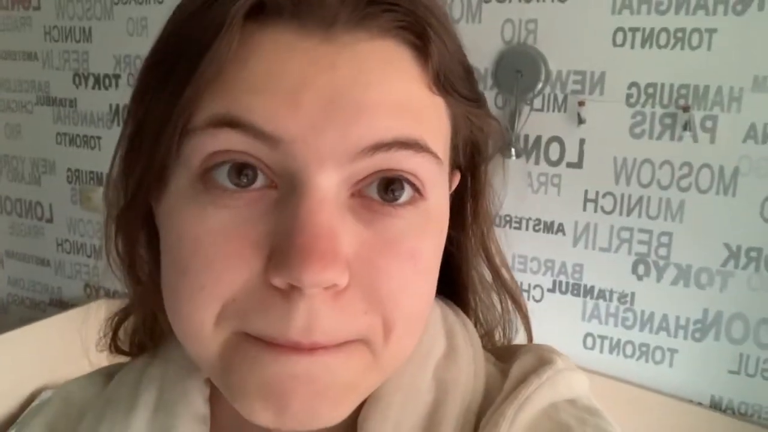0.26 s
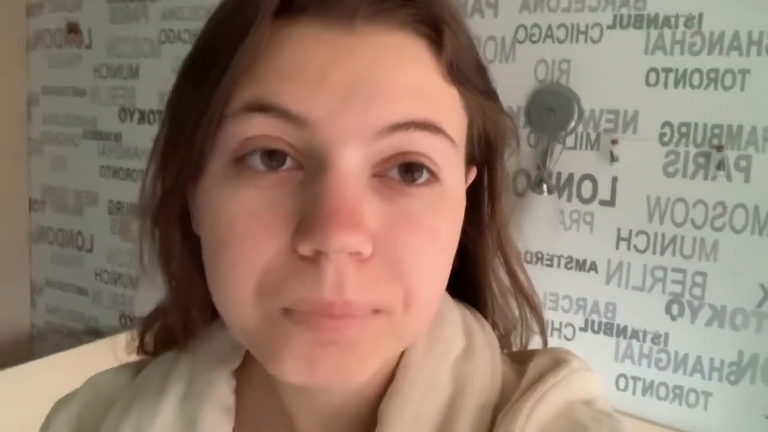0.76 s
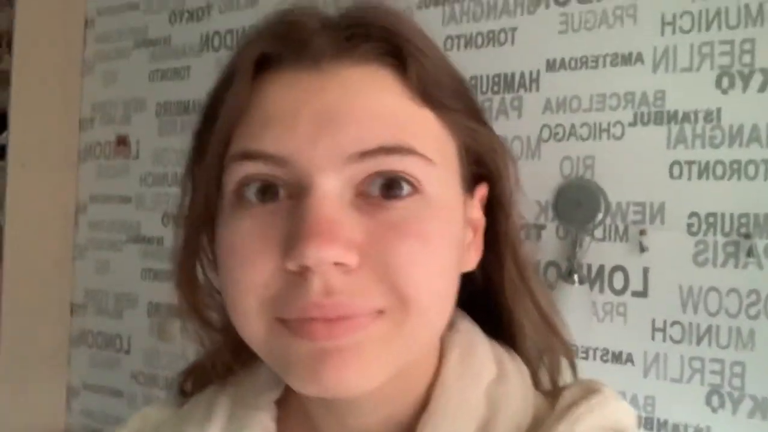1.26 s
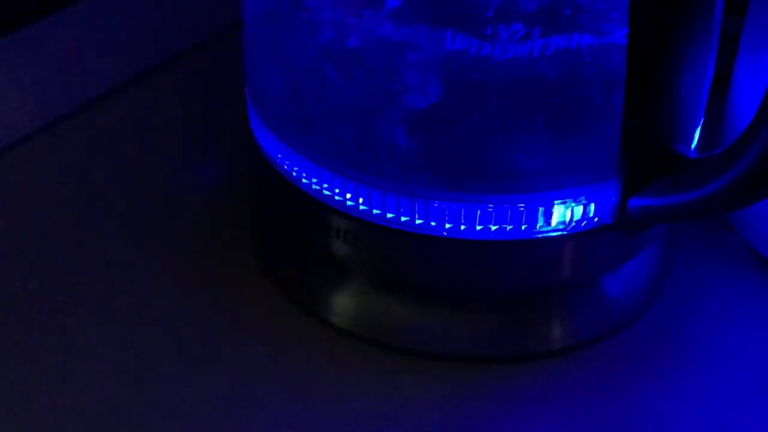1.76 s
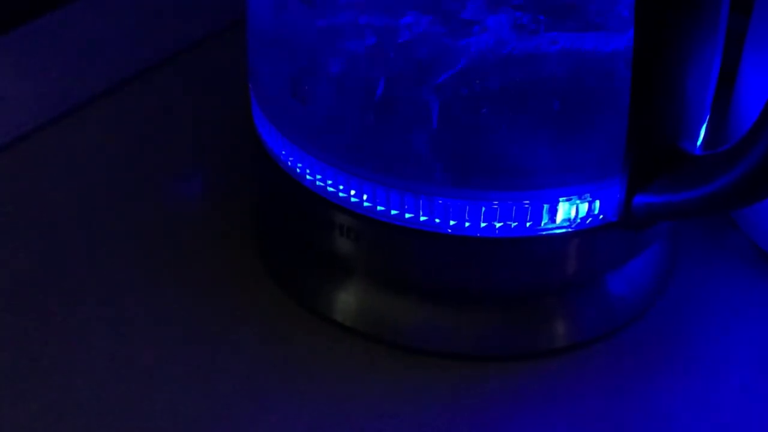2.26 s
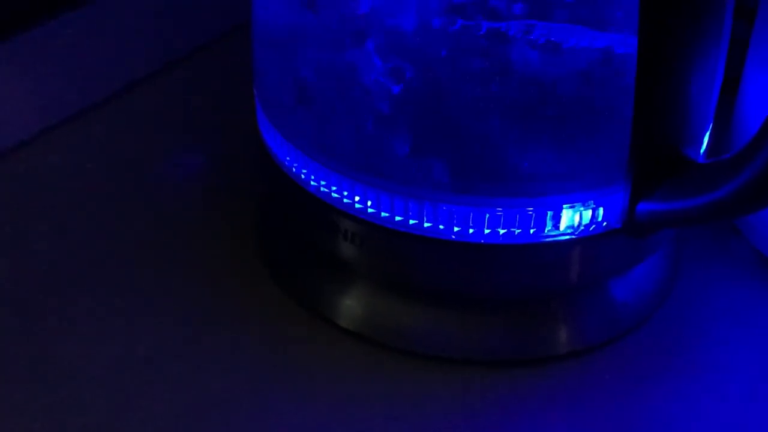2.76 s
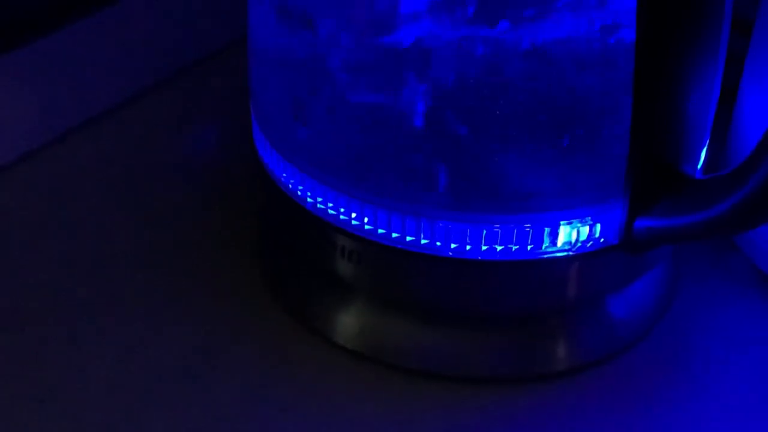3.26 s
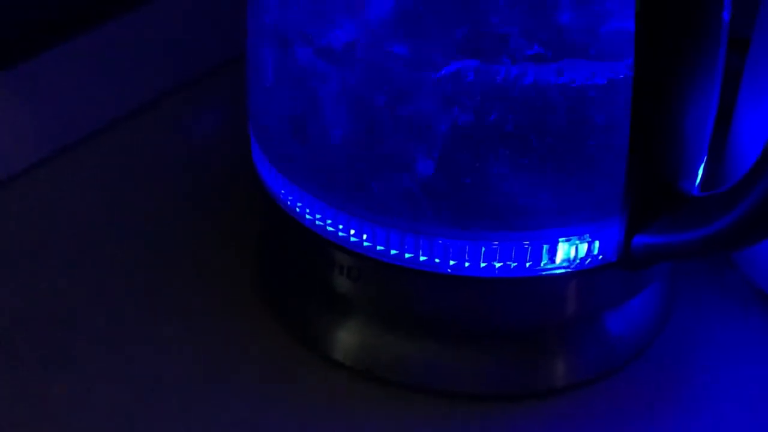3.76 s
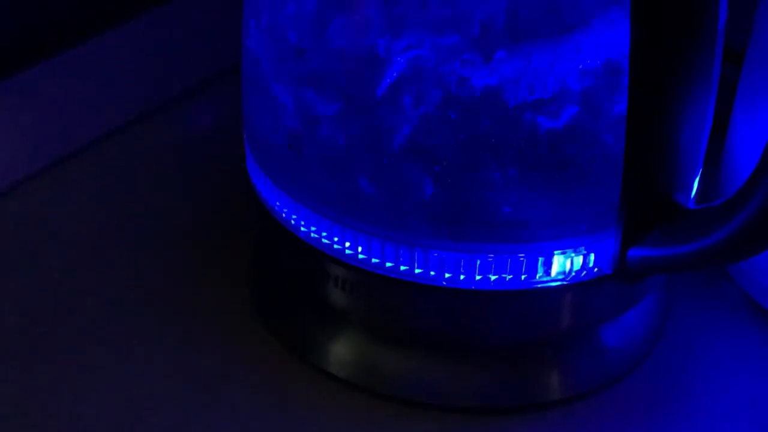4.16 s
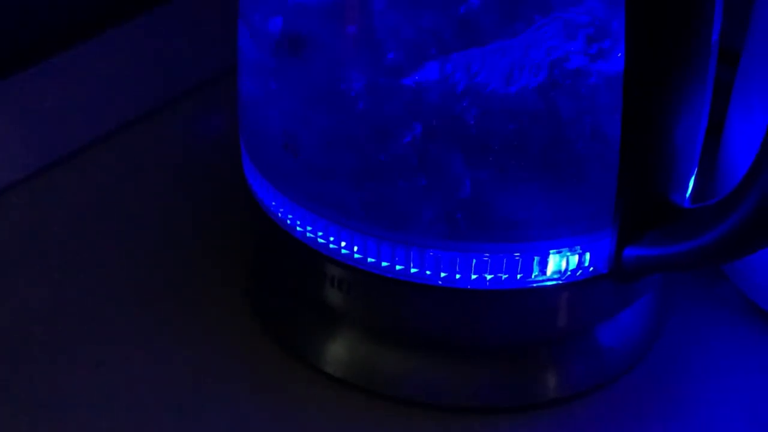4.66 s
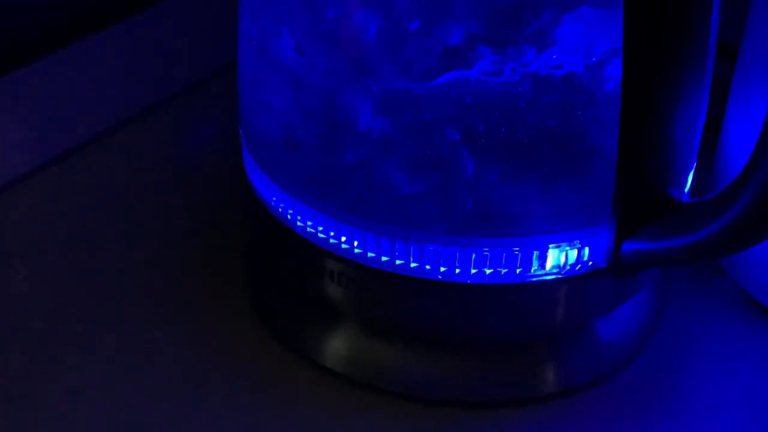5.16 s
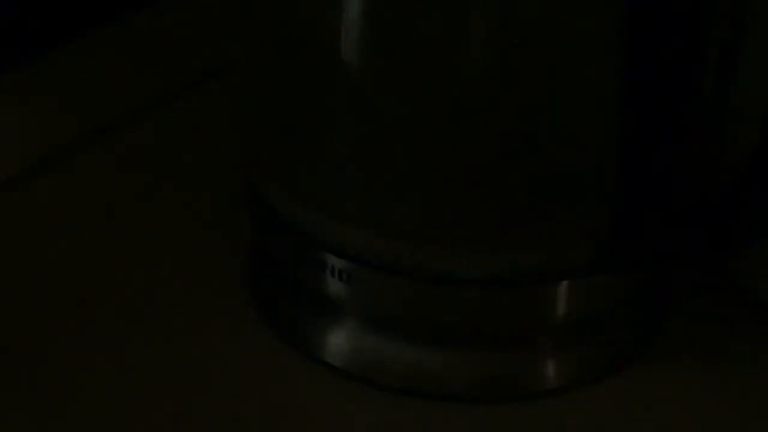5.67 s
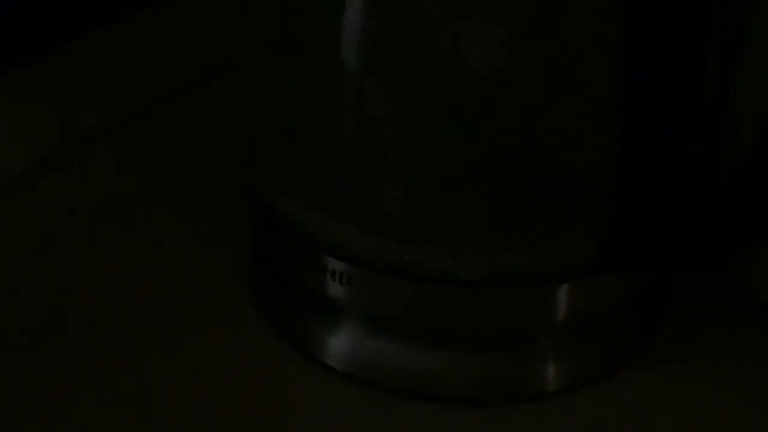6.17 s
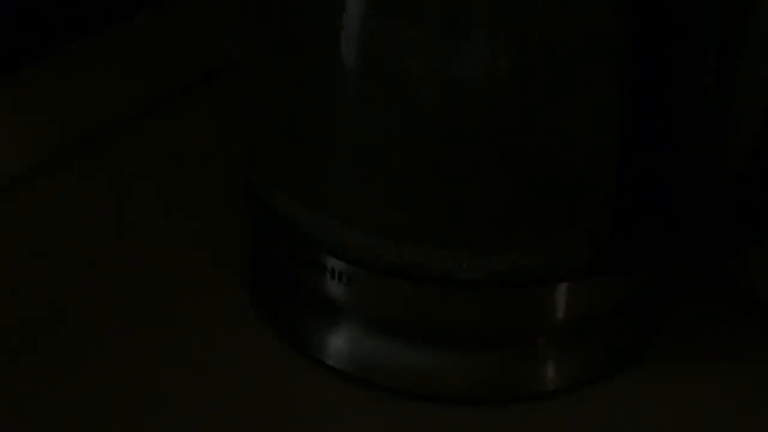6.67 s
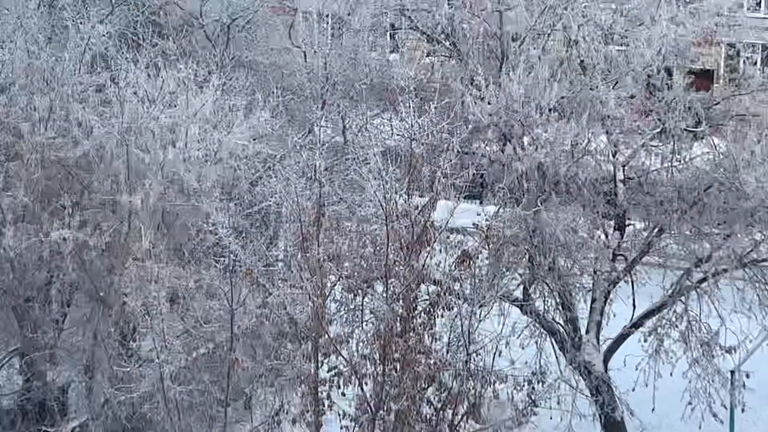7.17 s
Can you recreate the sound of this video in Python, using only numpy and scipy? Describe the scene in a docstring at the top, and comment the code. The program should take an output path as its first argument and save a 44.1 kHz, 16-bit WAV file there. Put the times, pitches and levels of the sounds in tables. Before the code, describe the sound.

Close phone pickup in a small kitchen. First faint room tone and dull handling knocks, then suddenly a rolling boil, low blubs around a steady throaty rumble, with thin simmering, plips and bright ticks of spray on top. A sharp plastic-and-metal switch click stands far above it, with a short room echo. Bubbling continues nearly unchanged for two seconds, then cuts off to a faint hum and thin swish.

```python
"""A small quiet kitchen, where a glass electric kettle is heard close to a phone at a rolling boil. Big steam
bubbles are swelling tones, and random thumps shake the water column. Small bubbles are short rings that simmer,
break and fizz; spat drops are noise ticks with short splashes. The thermostat snaps off with one sharp click,
made of noise rattles and ringing parts; the hot base keeps the water rolling. The kettle sound begins and ends
abruptly: quiet room tone comes before it, and after it that tone goes on with a faint hum added."""
import sys
import numpy as np
from scipy import signal
from scipy.fft import rfft, irfft, next_fast_len
from scipy.io import wavfile
from scipy.ndimage import uniform_filter1d

SR = 44100
rng = np.random.default_rng(int(sys.argv[2]) if len(sys.argv) > 2 else 0)


def file_out(sig):
    """Save sig as 16-bit WAV at sys.argv[1]."""
    # one column per channel
    cols = np.atleast_2d(sig).T
    # limit, then scale
    lim = np.clip(cols, -1, 1)
    pcm = np.round(lim * 32767).astype(np.int16)
    wavfile.write(sys.argv[1], SR, pcm)


N = 327266
T = np.arange(N) / SR  # time of every sample in seconds
SIZE = next_fast_len(N + SR, real=True) // 2 * 2
FREQS = np.arange(SIZE // 2 + 1) * SR / SIZE  # in Hz

BOIL_FROM_S, BOIL_TO_S, LEVER_S = 1.4735, 7.0708, 5.1971
EASE_DB_PER_S = 0.2  # the lesser rolling bubbles die down slowly once the heater is off
CHURN_DB, GURGLE_DB, SIMMER_DB, SPRAY_DB = -34, -36.5, -54.5, -6.5
# The rolling water makes layers surge at random: new steps per second, and depth in dB.
SURGE_RATE = 14
CHURN_SURGE_DB, SIMMER_SURGE_DB, SPRAY_SURGE_DB = .5, 1.2, 2.2
# Time for the echoes to fall by 60 dB, for the low part and the treble.
ROOM_T60_S, ROOM_T60_TOP_S = 0.43, 0.26
ECHOES_MERGE_S = .05
SHARED_HZ, SHARED_LAG_SAMPLES, TOP_HZ = 6200, 8, 15900

# Levels in these tables are starting points: the sources trim, filter or mix them further.
# Soft knocks of the hand on the phone. Each row: start in seconds, thud level in dB,
# tick level in dB, tick pitch in Hz.
HAND_KNOCKS = [(0.645, -57, -66.5, 2200), (0.668, -68, -76, 2200), (1.095, -60, -82, 1700),
               (1.346, -75, -68.5, 1100), (1.371, -69, -69, 1100), (1.385, -59, -59.5, 1020)]
# The switch lets go, snaps over, throws its lever and settles. Each row: start in seconds,
# steel disc level in dB, plastic rattle level in dB, decay in seconds.
SWITCH_STEPS = [(5.1903, -24.5, -26.5, 0.0067), (5.196, -7.5, -23.5, 0.0013), (5.1978, -14.5, -17, 0.0023),
                (5.2007, -20.5, -20, .0025)]
# Tones of the plastic housing, rung by the lever. Each row: pitch in Hz, level in dB,
# time to fall by 60 dB in seconds.
HOUSING_TONES = [(720, -5, .014), (1010, -19, .01), (1190, -21.5, .014), (1348, -16, .016),
                 (1860, -25, .024), (2290, -26.5, .022), (2710, -18, .024), (3100, -20.5, .028),
                 (3420, -24, .026), (4680, -27.5, 0.022), (5330, -27.5, .025), (5817, -28, .02),
                 (6700, -32, .03), (7500, -24.5, .022)]
# Faint tones of the jug after the jolt. Each row: pitch in Hz, level in dB,
# time to fall by 60 dB in seconds.
AFTER_RING_TONES = [(665, -39, 0.3), (866, -46, .25), (1254, -44, 0.43), (1370, -45, .38), (1650, -48, .3),
                    (1829, -48, 0.38), (2740, -45, .26), (2912, -48, .35), (4705, -48, 0.25),
                    (6600, -49, 0.23), (6700, -50, 0.27)]
# The biggest drops spat from the surface. Each row: start in seconds, tick level in dB,
# splash level relative to the tick in dB.
SPAT_DROPS = [(1.6636, -53, -12), (1.7308, -55.5, 1), (1.9735, -43, -12), (2.0948, -55, -5),
              (2.406, -55, 4), (2.4317, -47.5, -4.5), (2.4754, -46, -8), (2.4834, -53.5, 0),
              (2.595, -55.5, 4.5), (2.7496, -47.5, -8), (2.8812, -44, -7.5), (2.922, -44.5, -8),
              (2.994, -53, -13), (3.2443, -44.5, -9), (3.2737, -54, -6), (3.288, -47, -14),
              (3.3166, -49, -12), (3.333, -49, -9), (3.397, -50, -6), (3.4508, -49, -5), (3.5053, -50, -4),
              (3.6685, -48, -4.5), (3.7013, -53, -2), (3.801, -43, -7.5), (3.821, -53.5, 7.5),
              (3.8524, -51, -8), (3.9234, -48, -8), (4.0854, -64, 14), (4.247, -52, -4), (4.374, -49.5, -5),
              (4.4071, -54, -4), (4.6386, -50, -7), (4.9, -46, -7), (4.9332, -38, -8), (4.9606, -46, -12),
              (5.0018, -53.5, -3.5), (5.055, -50.5, -5), (5.4537, -49, -3), (5.482, -42, -6),
              (5.555, -42, -11), (5.6578, -59, -13), (5.7481, -49, -11), (5.8326, -52, 0.5),
              (5.8768, -50, -7), (6.1789, -45, -6.5), (6.3277, -57, -1), (6.397, -56, -1),
              (6.4743, -44.5, -22), (6.495, -54, -5), (6.7147, -64.5, 14)]
# How strong the surface spray is. Each row: time in seconds, level in dB.
SPRAY_COURSE = [(1.5, -59), (1.55, -77), (2.27, -65.5), (3.22, -67.5), (3.3, -58.5), (3.57, -65),
                (3.82, -59), (4.17, -63.5), (4.4, -58), (4.52, -67.5), (4.87, -68.5), (4.92, -59.5),
                (5.15, -61.5), (5.55, -62), (5.67, -64), (6.55, -61), (6.62, -71.5), (7.05, -59.5)]
# The loudest bubbles that break at the surface. Each row: start in seconds, level in dB, pitch in Hz.
BREAKING_BUBBLES = [(1.706, -35, 494), (1.734, -44.5, 3030), (1.855, -39, 480), (2.095, -40, 690),
                    (2.116, -38, 624), (2.168, -39.5, 560), (2.2007, -46, 1880), (2.281, -36.5, 637),
                    (2.2995, -45, 2000), (2.365, -42, 570), (2.4786, -46.5, 1470), (2.697, -38, 590),
                    (3.0518, -49.5, 1340), (3.267, -50, 710), (3.37, -39.5, 640), (3.3985, -48, 3120),
                    (3.5292, -48.5, 1850), (3.637, -38.5, 482), (3.669, -50, 3445), (3.7248, -47, 4050),
                    (3.8021, -47, 3660), (3.823, -40.5, 4100), (3.904, -41, 519), (3.935, -37.5, 493),
                    (4.0695, -39, 1890), (4.137, -47, 3057), (4.209, -41.5, 630), (4.304, -36, 636),
                    (4.35, -34, 495), (4.5689, -43.5, 1450), (4.6407, -47.5, 1350), (4.902, -33, 487),
                    (4.933, -35, 534), (5.025, -49, 3143), (5.06, -49.5, 3488), (5.489, -45, 2110),
                    (5.516, -50, 3316), (5.597, -41, 600), (5.695, -40, 570), (5.858, -46, 3340),
                    (5.885, -40, 560), (6.201, -46, 3574), (6.242, -49, 1636), (6.4221, -46, 2000),
                    (6.557, -40.5, 554), (6.6786, -45.5, 1460), (6.718, -42, 1950), (6.8023, -47.5, 3640),
                    (6.972, -53, 3290), (7.043, -39, 747), (7.054, -42, 1750), (7.0598, -39, 2077),
                    (7.063, -42, 2550)]
# The biggest steam bubbles. Each row: time in seconds, level in dB, pitch in Hz.
BIG_BUBBLES = [(1.578, -21, 287), (1.783, -24, 306), (1.855, -23, 276), (1.936, -19.5, 269.6),
               (2.057, -26.5, 311.5), (2.213, -23, 300), (2.386, -24, 307), (2.41, -24, 272),
               (2.5, -25.5, 298), (2.553, -27.5, 136.7), (2.65, -20.5, 289), (2.66, -28.5, 128.7),
               (2.754, -22.5, 287), (2.905, -26.5, 261), (3.066, -19, 304.5), (3.125, -23.5, 159.6),
               (3.256, -25, 324), (3.325, -24, 280), (3.514, -20.5, 285), (3.677, -27, 252),
               (4.019, -20.5, 291.3), (4.072, -18.5, 291.4), (4.136, -22, 156), (4.138, -25.5, 309),
               (4.285, -26.5, 158.7), (4.311, -24.5, 318), (4.344, -23, 313), (4.771, -26, 205.7),
               (4.789, -21, 300.4), (4.887, -29, 135.4), (5.111, -22, 284), (5.164, -20.5, 290),
               (5.246, -29.5, 104.7), (5.332, -22.5, 302), (5.448, -24.5, 298), (5.529, -24.5, 315.4),
               (5.66, -17, 289), (5.791, -24, 300), (5.988, -25, 288), (6.137, -23, 293), (6.245, -25, 221),
               (6.303, -24, 253.4), (6.39, -23, 281), (6.68, -21.5, 278.5), (6.692, -23, 189),
               (6.835, -24, 294.6), (7.043, -20.5, 264)]

# Resonances of the water in the jug. Each row: pitch in Hz, width in Hz, lift in dB.
WATER_RESONANCES = [(72.3, 6.7, 4), (154, 28, 2.5), (300, 25, 3.5), (399.6, 43, 6)]
# Resonances of the water-filled jug. Each row: pitch in Hz, width in Hz, lift in dB.
JUG_RESONANCES = [(1462, 100, 10), (1880, 90, 6.9), (2472, 300, 6.5), (3420, 200, 4.6), (4130, 130, 4.2)]
# Resonances of the glass. Each row: pitch in Hz, width in Hz, lift in dB.
GLASS_RESONANCES = [(3103, 52, 3.3), (5160, 130, 2.4), (5990, 180, 2.4), (6940, 98, 4), (10350, 200, 7.1)]
# Bright ring of the steel disc. Each row: pitch in Hz, width in Hz, lift in dB.
DISC_RESONANCES = [(11600, 630, 1), (15650, 490, 5.5)]

# Tone of the quiet room. Each row: frequency in Hz, relative level in dB.
ROOM_SPECTRUM = [(15, -54), (25, -13.5), (54, -4), (112, -2.5), (146, -11.5), (186, -12), (856, -30),
                 (2130, -36.5), (2300, -34.5), (10600, -46), (13100, -42), (15000, -56)]
# Tone of the snapping steel disc. Each row: frequency in Hz, relative level in dB.
DISC_SPECTRUM = [(3000, -33), (7000, -17.5), (9000, -4.5), (11000, -9), (13500, -10), (15600, -7)]
# Tone of the plastic rattle. Each row: frequency in Hz, relative level in dB.
RATTLE_SPECTRUM = [(400, -22), (900, -3), (1400, -3), (2100, -4), (2900, -3), (4000, -7.5), (5000, -6),
                   (6400, -9), (7500, -7), (9000, -20.5), (15600, -30)]
# Tone of the spray. Each row: frequency in Hz, relative level in dB.
SPRAY_SPECTRUM = [(900, -22.5), (1800, -3.5), (3500, 2), (6000, -4.5), (7800, 2.5), (8800, 0.5),
                  (11500, -3.5), (14200, 5), (16000, -5)]
# Tone of a drop's tick. Each row: frequency in Hz, relative level in dB.
TICK_SPECTRUM = [(2000, -22.5), (4500, -12.5), (6200, -3), (8000, -4.5), (10500, -1.5), (13000, -3),
                 (15000, 2), (16000, -1)]
# Tone of a drop's splash. Each row: frequency in Hz, relative level in dB.
SPLASH_SPECTRUM = [(500, -18), (1000, -1), (2000, 1.5), (3400, 0.5), (5000, -3), (6500, -4), (9000, -18)]
# Tone of the simmer. Each row: frequency in Hz, relative level in dB.
SIMMER_SPECTRUM = [(300, -25.5), (520, 1.5), (700, -7), (950, -3), (1200, -11.5), (1700, -20), (2100, -17),
                   (2700, -23), (3400, -18.5), (4800, -26.5), (7700, -39.5), (16000, -42)]
# Tone of the shaking water column. Each row: frequency in Hz, relative level in dB.
RUMBLE_SPECTRUM = [(25, -33), (40, -36.5), (55, -5.5), (70, -4.5), (90, -9), (120, -4.5), (200, -9),
                   (260, -7), (310, -5), (360, -19), (420, -15.5), (500, -25.5), (800, -32), (2000, -83)]
# Tone of the rolling bubbles. Each row: frequency in Hz, relative level in dB.
GURGLE_SPECTRUM = [(60, -12), (130, -2.5), (200, -1), (260, 1), (320, 3), (360, -7.5), (420, -6.5),
                   (490, -23), (700, -31)]
# Tones of the hand's thud and tick, the swish, and the crack of a breaking bubble.
# Each row: frequency in Hz, relative level in dB.
THUD_SPECTRUM = [(30, -10.5), (70, 0.0), (140, -2), (300, -12), (900, -40), (4000, -48)]
HAND_TICK_SPECTRUM = [(400, 2), (3000, -7), (12000, -35)]
SWISH_SPECTRUM = [(1800, -27), (3500, -3), (6000, -21)]
CRACK_SPECTRUM = [(350, -22.0), (600, 2.0), (1000, -6), (1500, -15), (3500, -21.5), (7000, -33.5)]

# How alike the two sides are. Each row: frequency in Hz, correlation from 0 to 1.
SIDE_LIKENESS = [(60, .97), (130, .96), (290, .9), (640, .88), (1400, .4), (2400, 0), (5500, 0), (6500, 1)]
# How far the phone shares one signal. Each row: frequency in Hz, share from 0 to 1.
TREBLE_SHARE = [(SHARED_HZ - 500, 0), (SHARED_HZ + 300, 1)]


def undb(db):
    """Turn decibels into a gain."""
    return 10 ** (np.asarray(db) / 20)


def unit(x):
    """Scale to an average (rms) strength of 1."""
    return x / np.sqrt(np.mean(x ** 2))


def across(points):
    """Join (Hz, value) points with straight lines on a log-frequency axis."""
    hz, value = np.transpose(points)
    return np.interp(np.log(FREQS + 1), np.log(hz), value)


def colour(x, points, modes=()):
    """Filter of unit power that never sounds early: a smooth spectrum with resonances on top."""
    db = across(points)
    for hz, width, lift in modes:
        db = db + lift / (1 + (2 * (FREQS - hz) / width) ** 2)
    # folding the cepstrum forward gives the minimum-phase filter
    cepstrum = irfft(np.log(unit(undb(db))))
    cepstrum[1:SIZE // 2] *= 2
    cepstrum[SIZE // 2 + 1:] = 0
    return irfft(rfft(x, SIZE) * np.exp(rfft(cepstrum)))[:N]


def add(out, s, sound):
    """Mix a short sound in at time s."""
    start = min(max(int(s * SR), 0), N)
    out[start:start + len(sound)] += sound[:N - start]


def scatter(count, mean_db, range_db, low, high):
    """Lesser events, loosely spread in time: rows of (s, dB, a third property between low and high)."""
    when, size, other = rng.random((count, 3)).T
    times = (np.arange(count) + when) / count * T[-1]
    levels = mean_db + range_db * (size - .5)
    return list(zip(times, levels, low + (high - low) * other))


def surge(depth_db):
    """A gain that wanders at random as the water rolls: smoothed random steps."""
    hold = int(SR / SURGE_RATE)
    steps = np.repeat(rng.standard_normal(N // hold + 1), hold)
    smooth = uniform_filter1d(uniform_filter1d(steps, hold), hold // 2)
    return undb(depth_db * unit(smooth)[:N])


def burst(decay_s):
    """Noise that starts at rms 1 and dies away exponentially."""
    t = T[:SR // 4]
    return rng.standard_normal(len(t)) * np.exp(-t / decay_s)


def pops(rate, spread_db):
    """Random impulses of either sign, rate per second; a positive spread makes a few of them large."""
    happens = rng.random(N) < rate / SR
    size = undb(spread_db * np.minimum(rng.exponential(size=N), np.pi))
    return unit(happens * size * rng.choice([-1, 1], N))


def ring(modes, contact_s):
    """The tones of something struck, each dying away; a longer contact softens the start."""
    t = T[:SR // 2]
    push = 1 - np.exp(-(t / contact_s) ** 2)
    tones = sum(undb(db) * np.sin(2 * np.pi * hz * t) * np.exp(-np.log(1000) * t / t60)
                for hz, db, t60 in modes)
    return -push * tones


def even(x, smooth_hz=90):
    """Level out a short rattle's spectrum so that it has no pitch of its own; its onset stays sharp."""
    spectrum = rfft(x, SIZE)
    power = np.abs(spectrum) ** 2
    ripple = uniform_filter1d(power, int(smooth_hz * SIZE / SR)) / power.mean()
    started = np.cumsum(np.abs(x)) > 0
    return irfft(spectrum / np.sqrt(ripple + 1e-6))[:N] * started


def bubble(hz, cycles, glide=.07):
    """One bubble rings and dies away over a few cycles; its pitch rises at first as it opens."""
    t = T[:int(6 * cycles / hz * SR)]
    age = t * hz / cycles
    envelope = (1 - np.exp(-t * hz * 2)) * np.exp(-age)
    return envelope * np.sin(2 * np.pi * hz * t * (1 + glide * np.minimum(age, 2) / 2))


def plinks(count, low_hz, high_hz, cycles, glide, falloff, spread_db):
    """Many weak and a few strong small bubbles; falloff weakens the high ones, or lifts them if negative."""
    out = np.zeros(N)
    for when, pitch, size in rng.random((count, 3)):
        hz = low_hz * (high_hz / low_hz) ** pitch
        strength = undb(-spread_db * np.log(size + .03))
        add(out, when * T[-1], strength * (low_hz / hz) ** falloff * bubble(hz, cycles, glide))
    return unit(out)


def swell(hz, swell_s, rise, turn, overtone_db=-31):
    """A steam bubble swells and rings down; rise bends its pitch (share per second), with an overtone."""
    t = T[:int(10 * swell_s * SR)]
    shape = (t / (2 * swell_s)) ** 2 * np.exp(2 - t / swell_s)  # peaks at 1 after 2 * swell_s
    phase = 2 * np.pi * (hz * (np.exp(rise * (t - 2 * swell_s)) - 1) / rise + turn)
    return shape * np.sin(phase) + undb(overtone_db) * shape ** 2 * np.sin(2 * phase)


def widen(x, scatter_s=0.003, width=1):
    """Nearby surfaces scatter the sound, so the two sides differ, by an amount set for each frequency."""
    echoes = burst(scatter_s)
    echoes /= np.sqrt(np.sum(echoes ** 2))
    share = np.clip(width * (1 - across(SIDE_LIKENESS)) / 2, 0, 1)
    spectrum = rfft(x, SIZE)
    mid = irfft(spectrum * np.sqrt(1 - share))[:N]
    side = irfft(spectrum * rfft(echoes, SIZE) * np.sqrt(share))[:N]
    return np.array([mid + side, mid - side])


def kitchen(x, wet_db, width):
    """The direct sound plus separate echoes that merge into a tail whose treble dies first."""
    t = T[:SR * 2 // 3]
    density = np.clip((t / ECHOES_MERGE_S) ** 2, 1 / 100, 1)
    happens = rng.random((2, len(t))) < density
    noise = rng.choice([-1, 1], (2, len(t))) * happens / np.sqrt(density)
    low = signal.sosfilt(signal.butter(1, 3500, fs=SR, output="sos"), noise)
    tail = low * np.exp(-np.log(1000) * t / ROOM_T60_S)
    tail += .5 * (noise - low) * np.exp(-np.log(1000) * t / ROOM_T60_TOP_S)
    tail *= np.clip(t / 0.0024, 0, 1)
    tail /= np.sqrt(np.mean(np.sum(tail ** 2, axis=1)))
    echoes = signal.fftconvolve(x[None], tail, axes=1)[:, :N]
    return widen(x, width=width) + undb(wet_db) * echoes


def quiet_room(tone_db=-68, hum_db=-69, hum_hz=151, swish_db=-77, swish_s=7.24):
    """Filtered noise as room tone, noise bursts as hand knocks; a faint hum and a thin swish at the end."""
    thuds, ticks = np.zeros(N), np.zeros(N)
    for s, thud_db, tick_db, hz in HAND_KNOCKS:
        add(thuds, s, undb(thud_db) * burst(decay_s=0.039))
        tick = colour(burst(decay_s=0.0064), HAND_TICK_SPECTRUM, [(hz, 600, 12)])
        add(ticks, s, undb(tick_db) * tick)
    thuds = colour(thuds, THUD_SPECTRUM)
    hum = undb(hum_db) * np.sin(2 * np.pi * hum_hz * T) * (T > BOIL_TO_S)
    swish = colour(pops(rate=1100, spread_db=-1.0), SWISH_SPECTRUM)
    swish *= undb(swish_db) * np.exp(-((T - swish_s) / 0.098) ** 2)
    tone = undb(tone_db) * colour(rng.standard_normal(N), ROOM_SPECTRUM)
    return widen(tone + thuds + ticks + hum + swish, scatter_s=.04)


def switch(knock_db=1.5, after_db=-3.0):
    """The bimetal disc snaps in a quick rattle, the lever knocks the housing, and the jug rings on."""
    steel, plastic, knock, after = np.zeros((4, N))
    for s, disc_db, rattle_db, decay_s in SWITCH_STEPS:
        add(steel, s, undb(disc_db) * burst(decay_s))
        add(plastic, s, undb(rattle_db) * burst(decay_s))
    add(knock, LEVER_S, undb(knock_db) * ring(HOUSING_TONES, contact_s=0.00028))
    add(after, LEVER_S, undb(after_db) * ring(AFTER_RING_TONES, contact_s=0.0046))
    # the small housing radiates no bass
    knock = signal.sosfilt(signal.butter(6, 570, "high", fs=SR, output="sos"), knock)
    steel = colour(even(steel), DISC_SPECTRUM, DISC_RESONANCES)
    plastic = colour(even(plastic), RATTLE_SPECTRUM)
    click = kitchen(steel, wet_db=-17, width=.8) + kitchen(plastic, wet_db=-6.5, width=1.0)
    return click + kitchen(knock, wet_db=-19, width=0.35) + widen(after)


def spray(spray_db, steady_db=-77):
    """Tiny bubbles fizz all the time; flurries of fine droplets tick on the glass."""
    tiny = plinks(count=15000, low_hz=3500, high_hz=15500, cycles=12, glide=.01, falloff=-.8, spread_db=2)
    fizz = unit(tiny + rng.standard_normal(N))
    droplets = plinks(count=5000, low_hz=4000, high_hz=15500, cycles=8, glide=.01, falloff=.4,
                      spread_db=2.5)
    flurry = unit(droplets + fizz) * undb(spray_db) * surge(SPRAY_SURGE_DB)
    return colour(flurry + fizz * undb(steady_db), SPRAY_SPECTRUM, GLASS_RESONANCES)


def spits(tick_db=-1, fizz_db=-5.0, splash_db=-1, splash_s=0.0087):
    """Larger drops burst with a bright tick, a brief fizz and a short splash with a pitch of its own."""
    ticks, splashes = np.zeros(N), np.zeros(N)
    rows = SPAT_DROPS + scatter(count=24, mean_db=-55.5, range_db=4.5, low=-9.5, high=2)
    for (s, db, body_db), pitch in zip(rows, rng.random(len(rows))):
        crack = burst(decay_s=.002)
        add(ticks, s, undb(db + tick_db) * crack + undb(db + fizz_db) * burst(decay_s=.006))
        splash_gain = undb(db + body_db + splash_db)
        add(splashes, s, splash_gain * burst(decay_s=splash_s))
        add(splashes, s, splash_gain * bubble(2600 * 2 ** pitch, cycles=12, glide=.02))
    ticks = colour(ticks, TICK_SPECTRUM, GLASS_RESONANCES)
    return ticks + colour(splashes, SPLASH_SPECTRUM, GLASS_RESONANCES)


def simmer(simmer_db, rumble, clump=0.65):
    """Small bubbles blip inside the jug over a soft wash, most strongly when the water heaves."""
    heave = unit(np.sqrt(uniform_filter1d(rumble ** 2, SR // 90) + 1e-12))
    blips = plinks(count=5800, low_hz=480, high_hz=7000, cycles=6, glide=.03, falloff=-1, spread_db=3)
    water = blips + 1.6 * rng.standard_normal(N)
    water = water * np.minimum(heave, np.sqrt(2)) ** clump
    return unit(colour(water, SIMMER_SPECTRUM, JUG_RESONANCES)) * undb(simmer_db)


def bursts(trim_db=2.0, ring_s=0.0035, daughter_db=-9, scatter_s=.013, crack_db=-9, count=6):
    """A breaking bubble cracks, rings and sheds smaller ones of nearby pitch; low ones glug, high ones plip."""
    out, cracks = np.zeros(N), np.zeros(N)
    glugs = scatter(count=8, mean_db=-45, range_db=6, low=540, high=760)
    plips = scatter(count=12, mean_db=-50.5, range_db=4.0, low=1400, high=4200)
    rows = BREAKING_BUBBLES + glugs + plips
    for (s, db, hz), daughters in zip(rows, rng.random((len(rows), count, 3))):
        add(cracks, s, undb(db + crack_db) * burst(decay_s=0.0083))
        add(out, s, undb(db + trim_db) * bubble(hz, ring_s * hz, glide=0.024))
        for late, pitch, size in daughters:
            own_hz = hz * 2 ** (.7 * (pitch - .45))
            daughter = bubble(own_hz, ring_s * own_hz, glide=0.02)
            add(out, s + late * scatter_s, undb(db + daughter_db) * size * daughter)
    return out + colour(cracks, CRACK_SPECTRUM)


def churn(churn_db):
    """Steam pockets grow and collapse on the hot base and shake the water column: filtered random pops."""
    rumble = unit(colour(pops(rate=300, spread_db=0.5), RUMBLE_SPECTRUM, WATER_RESONANCES))
    # steam is fed evenly, so a strong collapse leaves less for its neighbours
    rumble /= np.sqrt(uniform_filter1d(rumble ** 2, SR // 10) + 0.0087)
    return rumble * undb(churn_db)


def gurgle(gurgle_db, cycles=1.3, slide=9):
    """Lesser bubbles of many sizes roll up one after another, each sliding up or down in pitch."""
    out = np.zeros(N)
    rows = scatter(count=520, mean_db=0, range_db=5.5, low=105.1, high=430.5)  # low and high in Hz
    for (s, db, hz), (length, bend, turn) in zip(rows, rng.random((len(rows), 3))):
        swell_s = cycles * (.5 + length) / hz
        add(out, s, undb(db) * swell(hz, swell_s, slide * (2 * bend - 1), turn))
    return unit(colour(out, GURGLE_SPECTRUM)) * undb(gurgle_db)


def blubs(swell_s=0.00328, rise=1.2, trim_db=-1):
    """The biggest bubbles stand out of the boil as short swelling tones that climb slightly in pitch."""
    out = np.zeros(N)
    for (s, db, hz), turn in zip(BIG_BUBBLES, rng.random(len(BIG_BUBBLES))):
        add(out, s - .001, undb(db + trim_db) * swell(hz, swell_s, rise, turn))
    return out


def scene():
    """The kettle is heard only between the two quiet stretches; the room sounds throughout."""
    ease_db = -EASE_DB_PER_S * np.maximum(T - LEVER_S, 0)
    rolling = churn(CHURN_DB) + gurgle(GURGLE_DB + ease_db)
    rumble = rolling * surge(CHURN_SURGE_DB) + blubs()
    # rumble that has gone round the room: unrelated to the direct sound, opposite on the two sides
    around = (churn(CHURN_DB - 17.5) + gurgle(GURGLE_DB - 11)) * np.array([[1], [-1]])
    spray_db = SPRAY_DB + np.interp(T, *np.transpose(SPRAY_COURSE))
    surface = simmer(SIMMER_DB, rumble) * surge(SIMMER_SURGE_DB)
    surface = surface + bursts() + spray(spray_db) + spits()
    kettle = rumble + around + kitchen(surface, wet_db=-9.5, width=0.99) + switch()
    heard = np.clip(np.minimum(T - BOIL_FROM_S, BOIL_TO_S - T) / 0.0016, 0, 1)
    # the kettle is slightly louder on the right
    return kettle * heard * undb([[-.3], [.3]]) + quiet_room()


def record(dry):
    """The phone feeds the right treble to both sides, the left a few samples later, and cuts the top."""
    spectrum = rfft(dry, SIZE)
    lag = np.exp(-2j * np.pi * FREQS * np.array([[SHARED_LAG_SAMPLES], [0]]) / SR)
    share = across(TREBLE_SHARE)
    both = irfft((1 - share) * spectrum + share * lag * spectrum[1])[:, :N]
    return signal.sosfilt(signal.ellip(8, .2, 70, TOP_HZ, fs=SR, output="sos"), both)


dry = scene()
out = record(dry)
file_out(out)
```